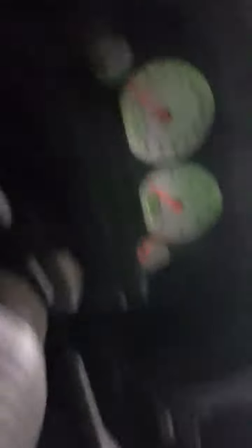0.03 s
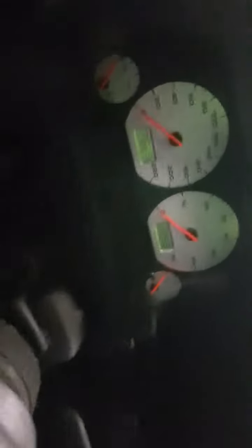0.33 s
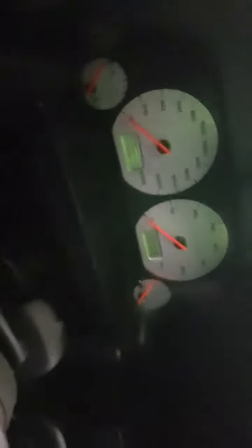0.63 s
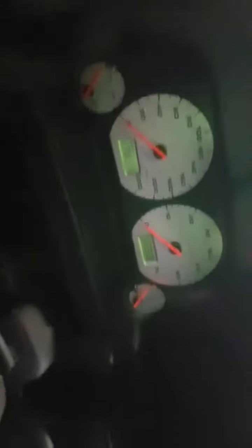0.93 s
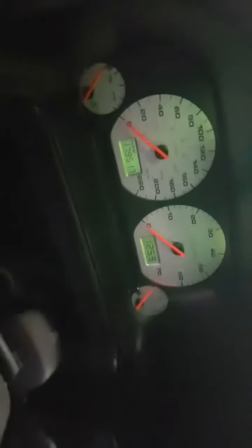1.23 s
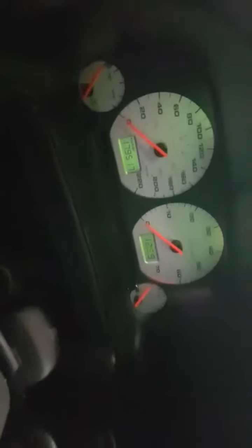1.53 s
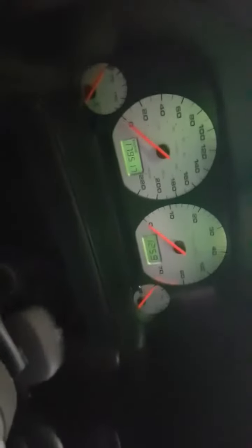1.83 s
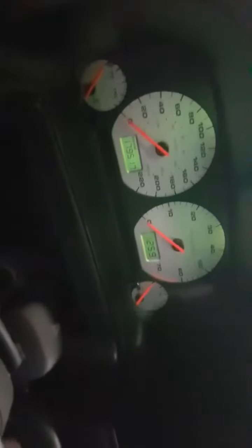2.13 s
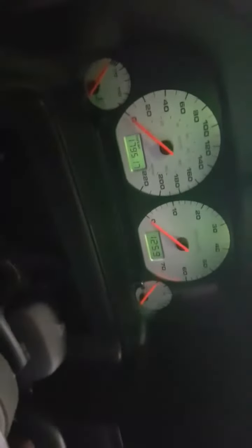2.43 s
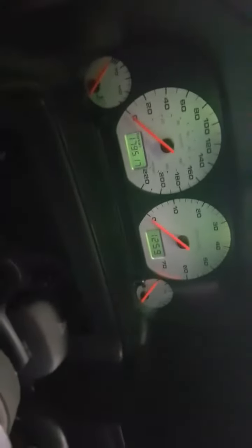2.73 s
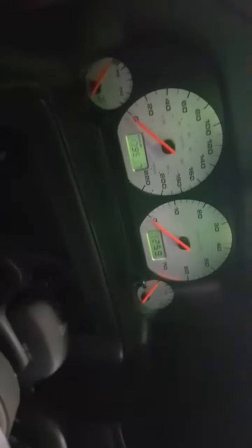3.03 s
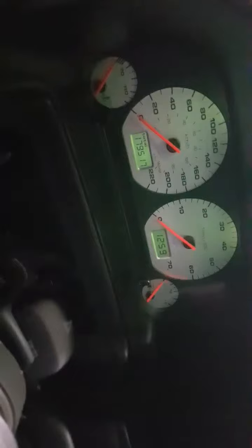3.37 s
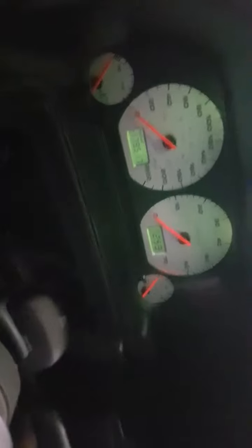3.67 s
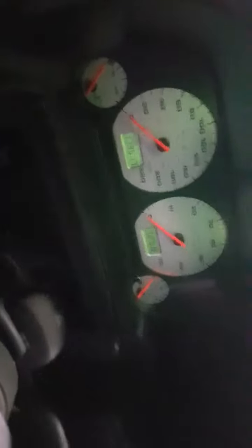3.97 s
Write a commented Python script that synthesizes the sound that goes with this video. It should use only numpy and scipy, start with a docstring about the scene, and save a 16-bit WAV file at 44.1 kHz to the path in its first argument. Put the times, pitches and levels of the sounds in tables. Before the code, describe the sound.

Inside a parked car, the engine's low idle fills the cabin until it is turned off and shakes to a stop. Irregular ignition lock clicks, key clinks and scrapes follow, close to the microphone's left.

```python
"""A four-cylinder engine booms at idle, heard from inside a parked car, its firing pulses filling the cabin.
Close on the left of the microphone the ignition lock clicks, keys clink on their ring and the key scrapes.
Switched off at 1.2 s, the engine shudders to rest on its last compression strokes, with a brief squeak.
The lock barrel then clunks against its stops and a spring rings; a faint whine stays on throughout."""
import sys
import numpy as np
from scipy import signal
from scipy.io import wavfile

SR = 44100
rng = np.random.default_rng(int(sys.argv[2]) if len(sys.argv) > 2 else 0)


def put_to_file(sound):
    """Save the sound as 16-bit audio at rate SR, in the file named by the first command-line argument."""
    columns = np.atleast_2d(sound).T  # one column per channel
    safe = np.clip(columns, -1, 1)
    whole_steps = np.round(safe * 32767)
    wavfile.write(sys.argv[1], SR, whole_steps.astype(np.int16))


N = 176400
T = np.arange(N) / SR
HIT_T = T[:SR // 5]  # time within one contact


def from_db(db):
    """Decibels to gain."""
    return 10 ** (np.asarray(db) / 20)


def rms_one(x):
    """Scale to rms 1."""
    return x / np.sqrt(np.mean(x ** 2) + 1e-20)


def curve(rows):
    """Join (time_s, value) points."""
    return np.interp(T, *np.transpose(rows))


def at_hz(points, hz):
    """Read a spectrum on a log axis."""
    freqs, values = np.transpose(points)
    return np.interp(np.log(hz), np.log(freqs), values)


def decay(t, t60_s):
    """Fall by 60 dB in t60_s."""
    return np.exp(-np.log(1000) * t / t60_s)


def pan(left_db):
    """Left and right gains of equal total power."""
    return rms_one(from_db([[left_db / 2], [-left_db / 2]]))


def drift(hz):
    """Slow random wander with rms 1."""
    slow = signal.sosfilt(signal.butter(2, hz, fs=SR / 20, output="sos"), rng.standard_normal(N // 10))
    return np.interp(np.arange(N) / 20, np.arange(N // 20), rms_one(slow[-(N // 20):]))


def add(out, start_s, sound):
    """Mix a sound in at start_s."""
    i = int(start_s * SR)
    out[:, i:i + sound.shape[-1]] += sound[..., :max(N - i, 0)]


# How alike the cabin sounds on the microphone's two sides: freq_hz, correlation
LIKENESS = [(60,1),(130,0.9),(250,0.73),(500,.5),(1000,-0.07),(4000,-0.16),(12000,0.5)]
# How much louder its left side is: freq_hz, left_db
BALANCE = [(60, -1.5), (180, 4), (520, -0.5), (1540, 5.5), (4520, 4.5), (13300, 6)]
def noise(spectrum, flicker_db):
    """Stereo noise in half-octave bands, each flickering by itself."""
    out, edges = 0, 20 * 2 ** (np.arange(20) / 2)
    white = rng.standard_normal((2, 2, N))
    for k, (low, high) in enumerate(zip(edges, edges[1:])):
        if high > spectrum[0][0] and low < spectrum[-1][0]:
            band = signal.butter(2, [low, high], "band", fs=SR, output="sos")
            mid, side = signal.sosfilt(band, white[k % 2])
            hz = np.sqrt(low * high)
            alike = at_hz(LIKENESS, hz)
            gain = from_db(at_hz(spectrum, hz) + flicker_db * drift(13.4)) * pan(at_hz(BALANCE, hz))
            out += gain * (np.sqrt(1 + alike) * mid + np.sqrt(1 - alike) * side * [[1], [-1]])
    return rms_one(out)


def burst(resonances, envelope):
    """A contact and its dense cabin reflections; each excites the resonances a little differently."""
    white, out = rng.standard_normal((3, len(HIT_T))), 0
    for k, (hz, width_hz, db) in enumerate(resonances):
        alike = np.clip(at_hz(LIKENESS, hz), 0.01, 1)
        drive = (np.sqrt(alike) * white[2] + np.sqrt(1 - alike) * white[:2]) * envelope
        peak = signal.iirpeak(hz * (1 + .02 * rng.normal()), hz / width_hz, fs=SR)
        out += (-1) ** k * from_db(db + 2.5 * rng.normal()) * signal.lfilter(*peak, drive + 1e-18)
    return out * np.sqrt(np.sum(envelope ** 2) / np.sum(out ** 2, axis=1, keepdims=True))


CONTACT_RISE = 1 - np.exp(-HIT_T / .00059)
def snap(t60_s):
    """Envelope of a hard contact: a crack and a short tail."""
    return CONTACT_RISE * (decay(HIT_T, t60_s) + from_db(-4) * decay(HIT_T, t60_s=.056))


# Cylinder firings at idle: time_s, rate_hz
FIRING = [(0,46.13),(.2,46.31),(.48,45.97),(.9,45.47),(1.2,45.5)]
# Their harmonics in the cabin: multiple, level_db
ORDERS = [(1,-15.5),(2,1.5),(3,-11),(4,-12.5),(5,-22),(6,-31.5),(7,-46),(8,-35),(9,-37)]
# Mechanical hiss and rumble, from inside the car: freq_hz, level_db
HISS = [(180,-40),(300,-7),(364,-10.5),(441,-9),(747,-15.5),(900,-20),(1590,-13),(2690,-15.5),(4200,-28.5),(5500,-30.5),(9000,-36),(12700,-45),(13800,-52)]
RUMBLE = [(20,-25),(35,-18.5),(80,0),(115,4),(160,-12.5),(225,-3),(300,-23),(500,-38),(1500,-75.5)]
# Both fade as the engine stops: time_s, level_db
HISS_LEVEL = [(0,-39.5),(1.15,-41),(1.3,-46),(1.45,-51.5),(1.62,-57.5),(1.9,-65.5),(2.15,-104),(4,-110)]
RUMBLE_LEVEL = [(0,-26.5),(1.2,-32.5),(1.5,-43.5),(1.8,-57.5),(2.05,-62.5),(2.4,-73.5),(4,-100)]
def idle(off_s=1.193, fade_s=.042):
    """Firing orders boom, with hiss pulsing in step, until the ignition is cut."""
    phase = 2 * np.pi * np.cumsum(curve(FIRING)) / SR
    boom = 0
    for order, db in ORDERS:
        waver = 1 + .065 * abs(order - 2) * drift(5.3)  # the second order holds steady
        boom += from_db(db) * waver * np.sin(order * phase + rng.uniform(0, 2 * np.pi))
    uneven_cylinders = 1 + .029 * (np.sin(phase / 2) + 0.91 * np.sin(phase / 4))
    running = np.exp(-np.maximum(T - off_s, 0) / fade_s)
    hiss = noise(HISS, flicker_db=1) * (1 + 0.086 * np.sin(2 * phase)) * from_db(curve(HISS_LEVEL))
    rumble = noise(RUMBLE, flicker_db=2.5) * from_db(curve(RUMBLE_LEVEL))
    return from_db(-14.5) * rms_one(boom * uneven_cylinders) * running * pan(-1.3) + hiss + rumble


# Room tone of the parked car: freq_hz, level_db
ROOM_TONE = [(15, -20.5), (25, -6), (96, -13.5), (125, -27.5), (411, -23.5), (481, -7), (535, -28.5),
             (611, -38), (754, -24), (12400, -48.5), (13800, -58)]
def cabin_tone(whine_hz=485):
    """A faint, wavering whine over the hush around the microphone."""
    whine = np.sqrt(2) * np.sin(2 * np.pi * whine_hz * T) * (1 + 0.23 * drift(3))
    return from_db(-70) * whine + from_db(-61) * noise(ROOM_TONE, flicker_db=2)


# Resonances of the lock and its housing: pitch_hz, width_hz, level_db
LOCK_BODY = [(574,310,-3),(1190,330,-7.5)]
LOCK_MID = [(1546,420,-7),(2030,330,-0.5),(2346,270,1.5),(2784,600,-6),(3380,600,-7),(4283,480,-6.5)]
LOCK_TREBLE = [(5370,130,-1),(6320,420,0),(7210,430,1.5),(8770,830,1.5),(10340,540,-0.5),(11970,730,-1.5)]
# Clicks, close on the left: start_s, gain_db, body_trim_db, treble_trim_db, left_db, t60_s
CLICKS = [(0.3877, -14, -21, -12.5, 8.5, 0.013), (1.059, -26, -10, -17, 21, 0.016),
          (1.1057, -24.5, -20, -11, 14, 0.013), (1.155, -23, -8.5, -14, 8.0, 0.015),
          (2.183, -43, -9, -35, 14, 0.011), (2.219, -39, -30, -26, 6, 0.0081),
          (2.2995, -32.5, -21, -21.5, 16, 0.016), (2.3084, -44, -6, -32, -1, 0.016),
          (2.4046, -47, 5, -8, 15, 0.012), (2.4848, -24.5, -14.5, -3, 15, 0.013),
          (2.5154, -39, -29, 2.5, 9, 0.015), (2.5294, -25.5, -18, -8.5, 11, 0.019),
          (2.5931, -33, -34, -13.5, 11.5, 0.013), (2.9224, -40, -29, -1.5, 11, 0.018),
          (2.9462, -29, -39, -17, 5, 0.021), (2.9619, -22.5, -39, 0.5, 11.0, 0.014),
          (2.9841, -24, -8.5, -16, 10, 0.019), (3.2337, -31.5, -19, -23, 10, 0.017),
          (3.267, -15.5, -19.5, -12, 9, 0.024), (3.2764, -25.5, -16, -3.5, 22, 0.021),
          (3.299, -34, -17, -10, 6, 0.017), (3.3206, -29.5, -13.5, -9, 12, 0.0095),
          (3.3907, -42.5, -9.5, -9, 14, 0.018), (3.4622, -32, -26, -17, 9, 0.019),
          (3.5076, -31, -22, -15, 7, 0.0087), (3.5739, -39.5, -3, -12, 16, 0.018),
          (3.5895, -53.5, -17, 7.5, 13, 0.018), (3.6226, -28, -23, -4, 10, 0.0091),
          (3.6618, -13, -15, -9.5, 7.0, 0.013), (3.7275, -35.5, -10, -1.5, 32, 0.01),
          (3.7848, -35.5, -24, -4.5, 12, 0.017)]
def lock_clicks():
    """Pins click: a bright crack over the duller ring of the housing."""
    out = np.zeros((2, N))
    for start_s, gain_db, body_trim_db, treble_trim_db, left_db, t60_s in CLICKS:
        body = from_db(-3 + body_trim_db) * burst(LOCK_BODY, decay(HIT_T, t60_s=.064))
        mid = from_db(-7.5) * burst(LOCK_MID, snap(t60_s))
        treble = from_db(-1.5 + treble_trim_db) * burst(LOCK_TREBLE, snap(t60_s))
        add(out, start_s, from_db(gain_db) * (body + pan(left_db) * (mid + treble)))
    return out


# Modes of a key, transposed for each clink: pitch_hz, relative_db, t60_s
KEY_MODES = [(2070,0,.062),(2170,-5,.045),(2310,-3,.05),(3445,-23,.05),(4500,-26,.04),(5310,-29,.045),(7350,-27,.04),(9383,-31,.04),(11970,-27,.02)]
# Keys, close on the left: start_s, pitch_hz, ring_gain_db, tick_gain_db, treble_gain_db, left_db
CLINKS = [(0.7136,2072,-18.5,-29.5,-41.5,6),(0.782,2200,-60,-56,-37.5,13),(1.24,2200,-60,-54,-42.5,10),(1.259,2220,-60,-52,-41.5,13),(1.3283,3224,-35.5,-30,-67,13),(1.778,2070,-54,-46,-58,8),(1.8705,2030,-47.5,-44.5,-52.5,11),(2.421,2104,-23,-31.5,-38,10),(2.5006,2070,-37,-27.5,-35.5,12),(2.62,2150,-36,-34,-48,11),(2.6357,2070,-42,-42,-58,9),(3.409,2066,-40,-39,-45,3),(3.4146,2020,-32.5,-31,-39,12),(3.843,2080,-23,-25,-32,6.5),(3.8756,1870,-43,-45,-63,7),(3.885,2180,-38,-35,-39,12),(3.918,1990,-41,-47,-44,10)]
def keys():
    """Keys strike each other: a tick and a short metallic ring."""
    out, strike = np.zeros((2, N)), snap(t60_s=.0072)
    for start_s, pitch_hz, ring_gain_db, tick_gain_db, treble_gain_db, left_db in CLINKS:
        ring = 0
        for mode_hz, relative_db, t60_s in KEY_MODES:
            hz = pitch_hz * mode_hz / KEY_MODES[0][0] * (1 + 0.016 * rng.normal())
            swing = np.sin(2 * np.pi * hz * HIT_T + rng.uniform(0, np.pi, (2, 1)))
            ring += from_db(relative_db - 1 + 1.5 * rng.normal()) * decay(HIT_T, t60_s) * swing
        tick = from_db(tick_gain_db) * burst(LOCK_MID, strike)
        tick += from_db(treble_gain_db - 1.5) * burst(LOCK_TREBLE, strike)
        add(out, start_s, pan(left_db) * (from_db(ring_gain_db) * ring * CONTACT_RISE + tick))
    return out


# Rubbing metal and the handled steering column: freq_hz, level_db
SCRAPE = [(240, -31), (400, -26.5), (562, 5.5), (791, -7.5), (1250, -1), (2070, 1.5), (5750, -13.5),
          (7510, -7.5), (12400, -34.5), (13800, -33)]
HANDLING = [(25,-10),(70,-2.5),(130,-8.5),(250,-9),(500,-20),(1000,-72),(3000,-33)]
# Key movements near the microphone: start_s, length_s, scrape_db, handling_db
SLIDES = [(1.05,0.066,-47.5,-60),(1.108,0.042,-40.5,-54),(1.65,0.17,-62.5,-63),(2.224,0.23,-60,-55),(2.469,0.068,-46.5,-52.5),(2.52,0.13,-59.5,-60.5),(2.873,0.05,-57.5,-61),(2.93,0.064,-47,-59),(3.25,0.026,-38,-48),(3.292,0.065,-47.5,-52),(3.396,0.062,-64,-62.5),(3.547,0.09,-57,-55),(3.644,0.021,-33.5,-45),(3.692,0.11,-46,-50.5),(3.829,0.053,-44,-52),(3.902,0.072,-61.5,-51.5)]
def key_scrapes(attack_s=.022, release_s=.021, catches_per_s=220):
    """The key scrapes, catching in tiny ticks, over the dull rumble of the handled column."""
    scrape, handling = 0, 0
    for start_s, length_s, scrape_db, handling_db in SLIDES:
        stroke = np.clip((T - start_s) / attack_s, 0, 1)
        stroke *= np.exp(-np.clip((T - start_s - length_s) / release_s, 0, 20))
        scrape += from_db(scrape_db) * stroke
        handling += from_db(handling_db) * stroke
    catches = rng.random(N) < catches_per_s / SR
    strength = from_db(2.5 * np.minimum(rng.exponential(1, N), 3))
    ticks = signal.lfilter([1], [1, -decay(1 / SR, t60_s=.016)], catches * strength + 1e-18)
    grit = rms_one(1 + rms_one(ticks))  # equal parts smooth sliding and catching
    metal = scrape * grit * noise(SCRAPE, flicker_db=2) * pan(1.6)
    return metal + handling * noise(HANDLING, flicker_db=2.5)


# Cabin modes around the microphone: pitch_hz, level_db, t60_s
CABIN_MODES = [(45,-17,.15),(68,-5,.11),(88,0,.1),(110,-3,.11),(200,-20,.1),(240,-26,.08)]
# The last compression strokes: start_s, gain_db
STROKES = [(1.211,-8),(1.257,-11),(1.296,-9.5),(1.34,-16.5),(1.4,-19),(1.456,-17),(1.525,-26),(1.588,-32.5),(1.667,-49),(1.754,-35),(1.818,-53),(1.926,-41.5)]
# The engine rocking on its mounts: freq_hz, level_db
ROCK = [(29,-7),(40,5),(55,-1.5),(78,-7)]
# The rocking swells and settles: time_s, level_db
ROCK_LEVEL = [(1.15,-70),(1.35,-31),(1.6,-40.5),(1.85,-48.5),(2.05,-58.5),(2.3,-75)]
def run_down(rise_s=.008):
    """Slowing compression strokes ring the cabin and rock the block."""
    out, boom = np.zeros((2, N)), 0
    for hz, db, t60_s in CABIN_MODES:
        boom += from_db(db) * decay(HIT_T, t60_s) * np.sin(2 * np.pi * hz * HIT_T)
    boom *= 1 - np.exp(-HIT_T / rise_s)
    for start_s, gain_db in STROKES:
        add(out, start_s, from_db(gain_db) * boom * pan(-1.3))
    return out + from_db(curve(ROCK_LEVEL)) * noise(ROCK, flicker_db=-1.5)


# Resonances of a faint squeak, left of centre: pitch_hz, width_hz, level_db
SQUEAK = [(1750,250,2),(2160,270,-8)]
def squeak(start_s=1.662, length_s=.11, slip_hz=52):
    """Something slips with a brief dry squeak as the engine stops."""
    out = np.zeros((2, N))
    slips = (HIT_T < length_s) * (1 + .5 * np.sin(2 * np.pi * slip_hz * HIT_T))
    add(out, start_s, from_db(-55.5) * pan(5.1) * burst(SQUEAK, slips))
    return out


# Resonances of the barrel's knock and thud: pitch_hz, width_hz, level_db
KNOCK = [(517,54,-12.5),(620,77,-6.5),(810,99,-20)]
THUD = [(118.4,17,-2),(236,38,-9.5),(363,84,-11.5)]
# Clunks, close by: start_s, knock_db, thud_db
CLUNKS = [(2.485,-44,-43.5),(2.984,-27.5,-44.5),(3.26,-32,-50),(3.661,-34,-33)]
def barrel_clunks(spring_s=2.986, spring_hz=1017):
    """The lock barrel hits its stops; after the second hit a spring rings on."""
    out = np.zeros((2, N))
    for start_s, knock_db, thud_db in CLUNKS:
        knock = from_db(knock_db) * burst(KNOCK, decay(HIT_T, t60_s=.049))
        thud = from_db(thud_db) * burst(THUD, decay(HIT_T, t60_s=.17))
        add(out, start_s, knock + thud)
    add(out, spring_s, from_db(-62) * decay(T, t60_s=1.1) * np.sin(2 * np.pi * spring_hz * T))
    return out


def scene():
    """Engine, lock and keys, heard from one spot in the cabin."""
    return (idle() + cabin_tone() + lock_clicks() + keys() + key_scrapes()
            + run_down() + squeak() + barrel_clunks())


def record(dry, low_hz=31.2, top_hz=13300):
    """The stereo microphone loses the deepest bass; the top is cut steeply."""
    dry = signal.sosfilt(signal.butter(3, low_hz, "high", fs=SR, output="sos"), dry)
    return signal.sosfilt(signal.ellip(10, .3, 80, top_hz, fs=SR, output="sos"), dry)


dry = scene()
out = record(dry)
put_to_file(out)
```